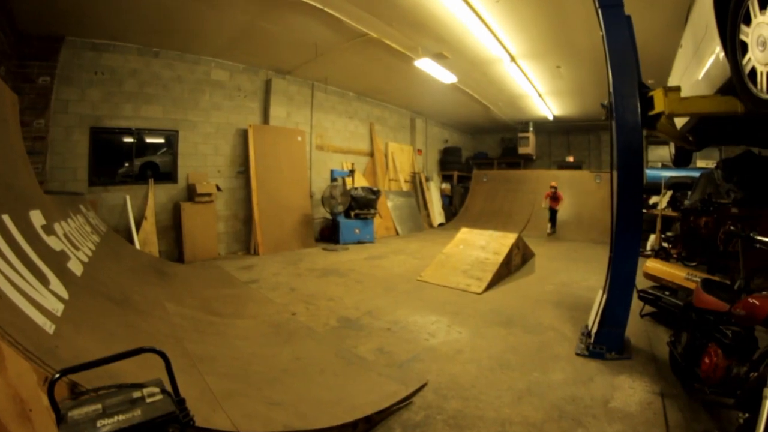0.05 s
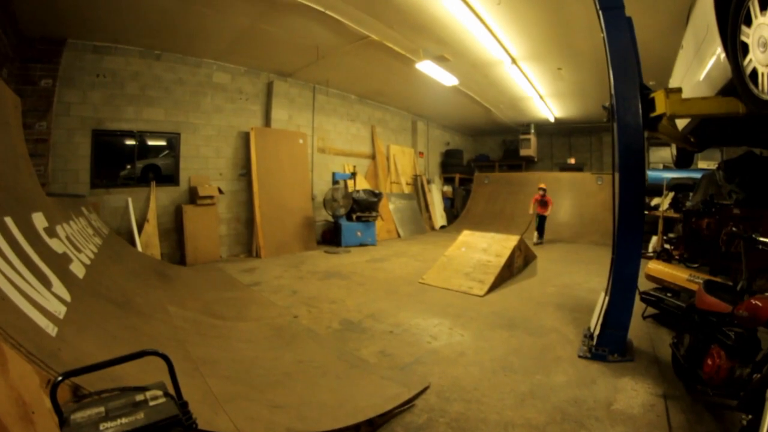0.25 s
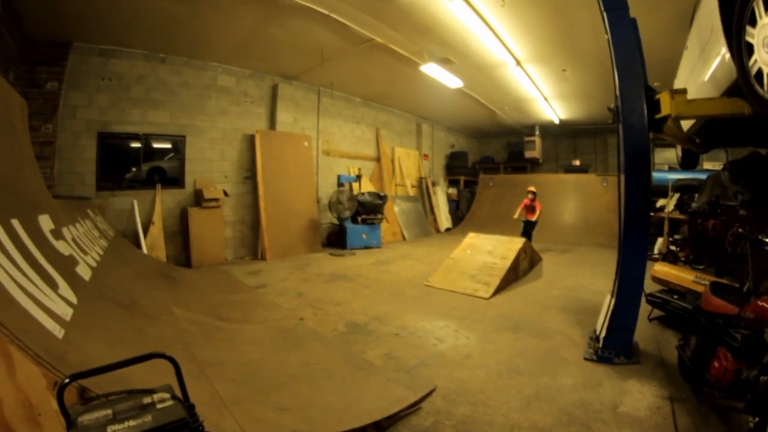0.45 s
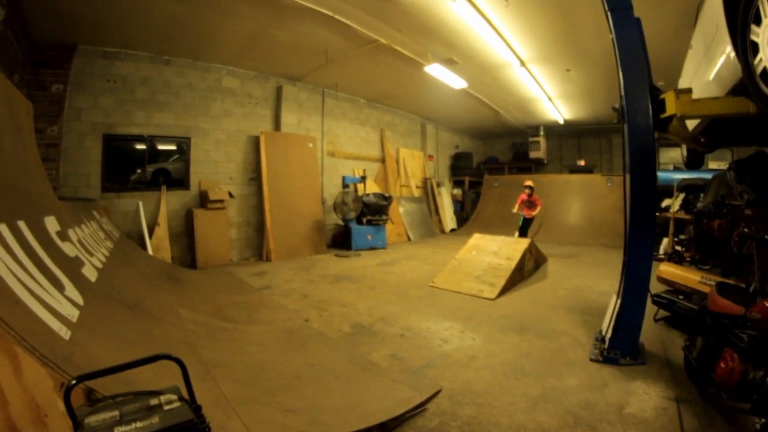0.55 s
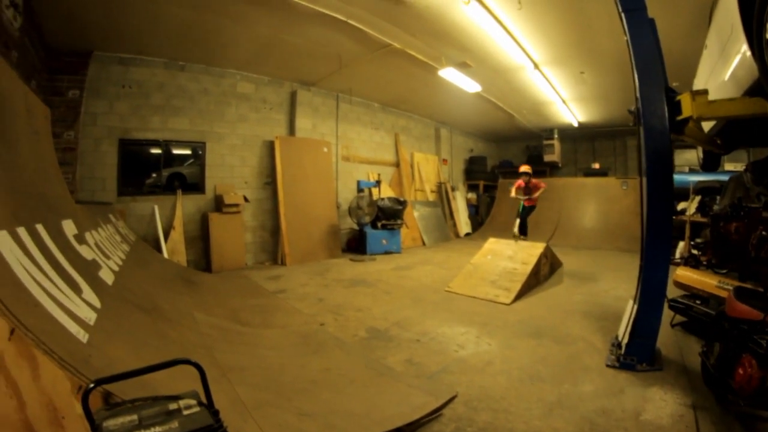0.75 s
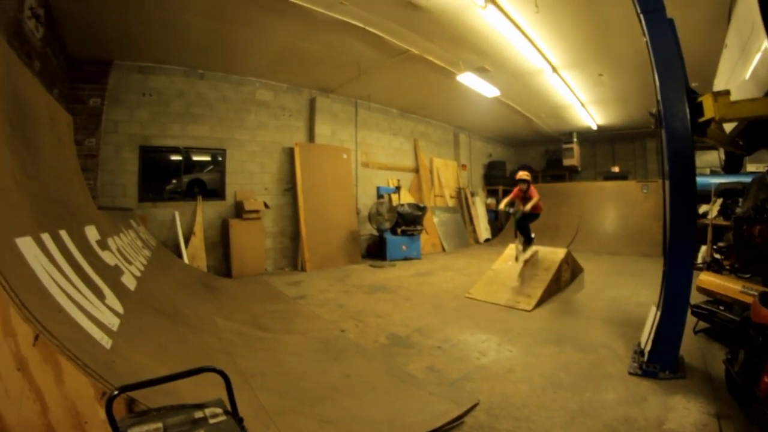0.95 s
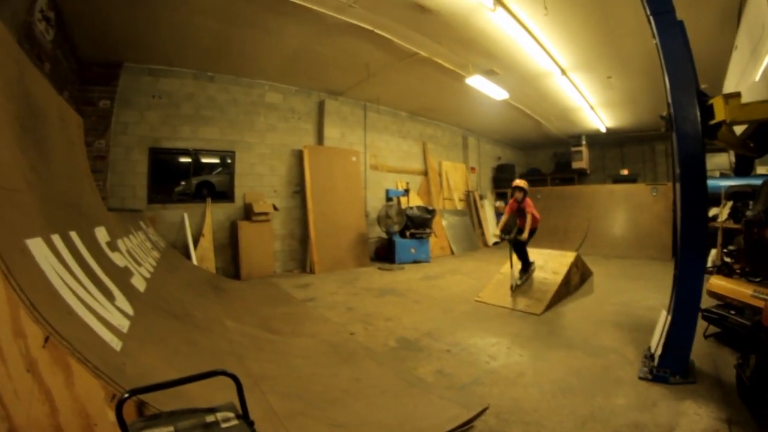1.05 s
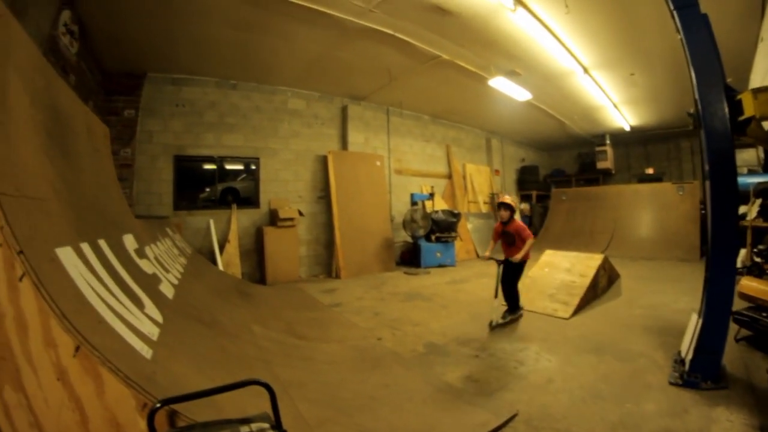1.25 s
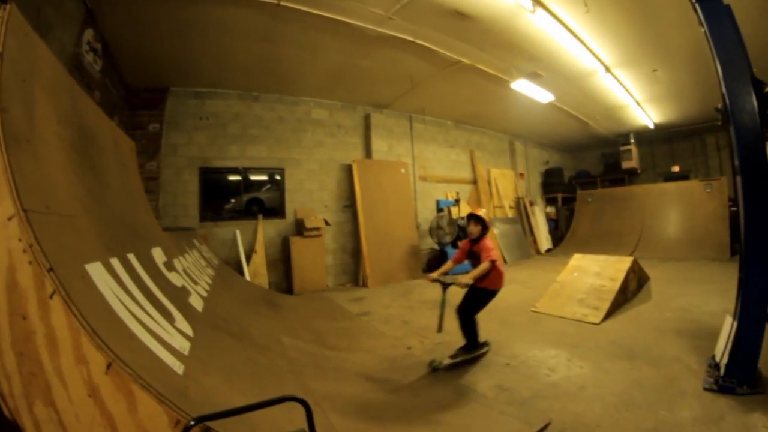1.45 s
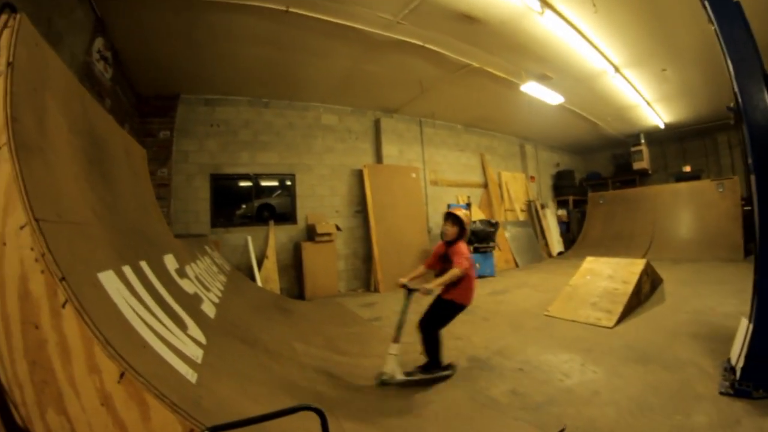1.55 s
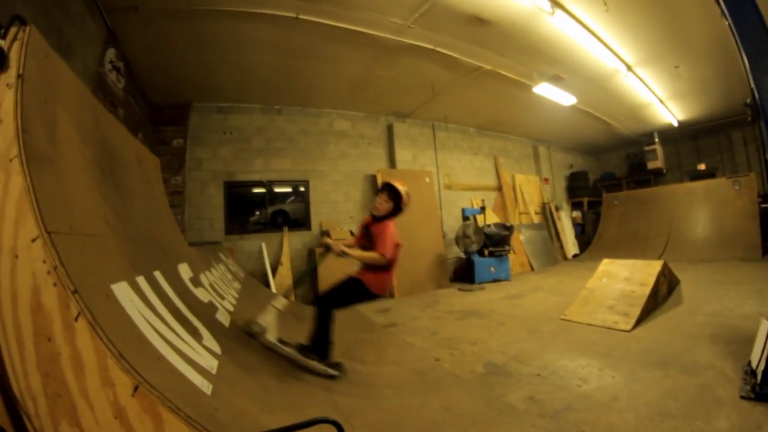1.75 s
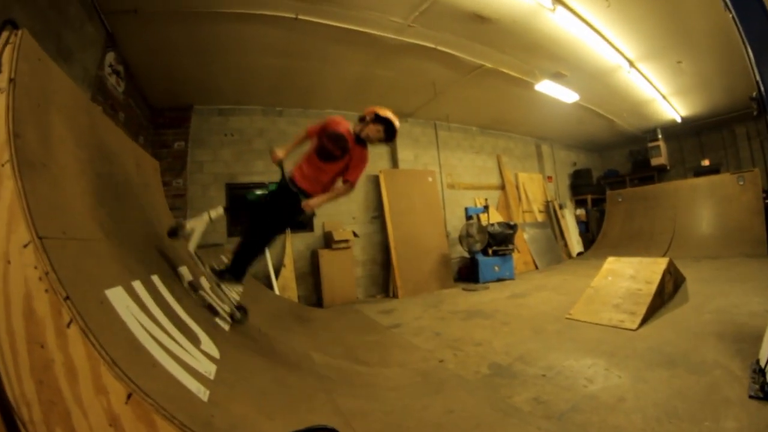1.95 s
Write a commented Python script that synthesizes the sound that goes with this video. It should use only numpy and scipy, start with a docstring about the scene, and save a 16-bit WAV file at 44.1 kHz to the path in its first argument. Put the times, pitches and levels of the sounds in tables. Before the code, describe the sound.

In a large, echoing workshop, a kick scooter approaches the microphone with rumbling wheels. It thuds over a plywood jump, lands with a clatter and a hollow metallic ring, then hits another ramp close by with sharp clacks.

```python
"""A kick scooter in a concrete workshop, closing from nine metres to just over one from the microphone.
It rolls off a booming plywood quarter pipe, whose edge plate rings, bangs up a kicker and flies.
It lands on the floor, deck rattling and loose parts ticking, then clacks onto a ramp close by.
All the way its frame rings with a hollow note at each jolt, and walls and a long room tail answer.
The hardest blows clip, and the limiter ducks after them."""
import sys
import numpy as np
from scipy import signal
from scipy.fft import rfft, irfft, next_fast_len
from scipy.io import wavfile
from scipy.ndimage import map_coordinates

SR = 44100
rng = np.random.default_rng(int(sys.argv[2]) if len(sys.argv) > 2 else 0)


def transcribe(signal):
    """Save signal, clipped to [-1, 1], as a 16-bit WAV file at the path in sys.argv[1]."""
    frames = np.atleast_2d(signal).T
    limited = np.clip(frames, -1, 1)
    pcm = np.round(limited * 32767).astype(np.int16)
    wavfile.write(sys.argv[1], SR, pcm)


N = 88200
HIT = SR // 2  # samples in one struck sound
TIME = np.arange(N) / SR


def amp(db):
    """Decibels to gain."""
    return np.exp(np.asarray(db) * np.log(10) / 20)


def unit_rms(x):
    """Scale to rms 1."""
    return x / np.sqrt(np.mean(x ** 2) + 1e-20)


def unit_energy(x):
    """Scale so that the squares sum to 1."""
    return x / np.linalg.norm(x)


def along(points, hz):
    """Read (Hz, value) points on a log frequency axis."""
    freqs, values = np.transpose(points)
    return np.interp(np.log(hz + 1), np.log(freqs + 1), values)


def level(points):
    """Gain per sample from (s, dB) points."""
    return amp(np.interp(TIME, *np.transpose(points)))


def filtered(x, response):
    """Filter x by a gain that is a function of frequency."""
    size = next_fast_len(N + SR // 4)
    return irfft(rfft(x, size) * response(np.fft.rfftfreq(size, 1 / SR)), size)[..., :N]


def noise(spectrum, tilt_db=0, size=N):
    """Coloured noise of rms 1, tilted by dB per octave above 500 Hz."""
    hz = np.fft.rfftfreq(size, 1 / SR)
    octaves = np.log2(np.maximum(hz / 500, 1))
    colour = amp(along(spectrum, hz) + tilt_db * octaves)
    return unit_rms(irfft(rfft(rng.standard_normal(size)) * colour, size))


def rough_noise(spectrum, depth_db, knots_per_s):
    """Coloured noise of rms 1 whose level follows a smooth random curve."""
    steady = noise(spectrum)
    wobble = map_coordinates(rng.standard_normal(1024), [TIME * knots_per_s], mode="wrap")
    return unit_rms(steady * amp(depth_db * wobble))


def fade(rise_s, t60_s):
    """Half a second of attack and decay."""
    t = np.arange(HIT) / SR
    return (1 - np.exp(-t / rise_s)) * amp(-60 * t / t60_s)


def ring(modes, rise_s, scatter_db, detune=0):
    """Damped sines, scattered in level, and in pitch if detuned, at every strike."""
    out = np.zeros(HIT)
    for k, (hz, db, t60) in enumerate(modes):
        t = np.arange(min(HIT, int(2 * t60 * SR))) / SR
        pitch = hz * np.exp(detune * rng.normal())
        wave = (-1) ** k * np.sin(2 * np.pi * pitch * t)
        out[:len(t)] += amp(db + scatter_db * rng.normal()) * fade(rise_s, t60)[:len(t)] * wave
    return out


def add(track, start_s, sound):
    """Mix a sound into the track."""
    part = track[max(round(start_s * SR), 0):][:len(sound)]
    part += sound[:len(part)]


# The workshop at rest. Each row: frequency in Hz, level in dB.
ROOM_TONE = [(20, -10), (45, -3), (80, -3), (130, -1), (220, -1), (400, -19), (1500, -20), (15000, -53)]

def room_tone():
    """A faint, low, steady noise around the microphone."""
    return amp(-48) * noise(ROOM_TONE)


# How long the workshop rings. Each row: frequency in Hz, t60 in seconds.
ROOM_T60 = [(100, 0.71), (400, 0.84), (1300, 1.04), (3200, 1.11), (6000, 0.51), (14000, 0.62)]

def reverb(x, rise_s=0.004):
    """The room's diffuse tail: noise dying away band by band, drawn anew at each call."""
    hz, t, bands = signal.stft(rng.standard_normal(SR * 3 // 4), SR, nperseg=256)
    envelope = amp(-60 * t / along(ROOM_T60, hz)[:, None]) * (1 - np.exp(-t / rise_s))
    tail = signal.istft(bands * envelope, SR, nperseg=256)[1]
    return signal.fftconvolve(x, unit_energy(tail))[:N]


# Wall echoes at the microphone. Each row: delay in seconds, level in dB.
WALLS = [(.0116, -7), (.0142, -6.5), (.0158, -12.5), (.0262, -13.5)]

def add_echoes(track, start, sound):
    """Walls return distinct echoes; ramps and shelves scatter a short wash."""
    for delay, db in WALLS:
        add(track, start + delay + rng.normal(0, 0.00023), amp(db) * sound)
    clutter = unit_energy(fade(rise_s=0.0021, t60_s=0.15) * rng.standard_normal(HIT))
    add(track, start + 0.0099, amp(-1) * signal.fftconvolve(sound, clutter))


# Colours of wheel roar, board rumble and ramp boom. Each row: frequency in Hz, level in dB.
ROAR = [(60, -70), (250, 5), (450, 2), (780, 6), (1050, 1.5), (1600, 2.5), (2400, -6.5), (3600, -11.5),
        (5500, -18), (8000, -30.5), (15000, -47.5)]
RUMBLE = [(20, -43), (42, -41), (62, -22), (90, -1), (135, 1), (200, 2), (300, -7.5), (500, -7), (1200, -5),
          (4000, -57)]
BOOM = [(18, -3), (42, -28), (65, -10), (120, -22), (400, -58)]
# Roar and rumble as they reach the microphone. Each row: time in seconds, level in dB.
ROAR_LEVELS = [(0, -32), (.19, -31), (.27, -25.5), (.37, -20), (.42, -28.5), (.54, -26.5), (.7, -21),
               (.88, -28), (1, -32), (1.14, -33), (1.25, -19), (1.32, -25.5), (1.42, -29.5), (1.51, -33),
               (1.6, -18.5), (1.77, -28), (1.88, -34.5), (2, -40)]
RUMBLE_LEVELS = [(0, -28.5), (.2, -29), (.25, -21.5), (.31, -20.5), (.39, -36.5), (.55, -40), (.61, -12.5),
                 (.74, -33), (.85, -27.5), (1.12, -52.5), (1.2, -24), (1.26, -21), (1.33, -25.5),
                 (1.42, -48), (1.52, -63), (1.6, -39), (1.8, -34.5), (2, -40.5)]
# On the far quarter pipe, then the near one. Each row: start and end in seconds, level in dB.
RAMP_RIDES = [(-.1, 0.376, -35.5), (1.528, 2.1, -40.5)]

def rolling(boom_fade_s=0.049):
    """Hard wheels roar over grit, the boards rumble and the hollow quarter pipes boom."""
    roar = level(ROAR_LEVELS) * rough_noise(ROAR, depth_db=0.63, knots_per_s=140)
    rumble = level(RUMBLE_LEVELS) * rough_noise(RUMBLE, depth_db=1.6, knots_per_s=35.33)
    on_ramp = sum(amp(db) * np.clip(np.minimum(TIME - start, end - TIME) / boom_fade_s, 0, 1)
                  for start, end, db in RAMP_RIDES)
    return roar + rumble + on_ramp * noise(BOOM)


# The deck, two to three metres off. Each row: frequency in Hz, level in dB.
DECK_RATTLE = [(150, -25), (580, 11), (1000, -3), (1800, 1), (3500, -9), (6000, -19), (9000, -21.5),
               (15000, -34)]

def deck_rattle(start_s=1.222, length_s=0.12):
    """The deck rattles briefly on the concrete after the landing."""
    progress = np.clip((TIME - start_s) / length_s, 0, 1)
    swell = np.sqrt(np.abs(np.sin(np.pi * progress)))
    rattle = amp(-23) * swell * rough_noise(DECK_RATTLE, depth_db=3.3, knots_per_s=260)
    return rattle + amp(-5) * reverb(rattle)


# The far ramp's edge plate. Each row: frequency in Hz, level in dB, t60 in seconds.
PLATE_MODES = [(554, -4, .3), (732, -1, .28), (958, -7, .25), (1217, -4, .4), (1653, -14, .4),
               (1830, -14, .3), (4037, -27, .4), (4274, -24, .25)]
# Loose parts, nearer the microphone. Each row: start in seconds, level in dB.
TICKS = [(1.2515, -16.5), (1.257, -24), (1.265, -15), (1.283, -16), (1.296, -29)]
# A tick's colour. Each row: frequency in Hz, level in dB.
TICK_COLOUR = [(500, -18), (2000, 2), (6000, 6), (9000, -14), (15000, -13)]

def metal_parts():
    """The edge plate rings as the wheels leave it; loose metal ticks after the landing."""
    out = np.zeros(N)
    add(out, 0.312, amp(-12) * ring(PLATE_MODES, rise_s=0.0076, scatter_db=2.5))
    for start, db in TICKS:
        add(out, start, amp(db) * fade(rise_s=0.0009, t60_s=0.019) * noise(TICK_COLOUR, size=HIT))
    return out + amp(-8.5) * reverb(out)


# The frame's hollow note. Each row: frequency in Hz, level in dB, t60 in seconds.
FRAME_MODES = [(1288.5, 2.5, 0.056), (1366, -10, 0.023), (1205, -4, 0.066), (2460, -21, 0.086),
               (3300, -24.5, 0.085)]
# Jolts that ring only the frame. Each row: start in seconds, level in dB.
JOLTS = [(0.335, -21), (0.355, -22), (0.375, -18), (0.422, -16), (0.459, -15), (0.508, -18.5), (0.73, -3),
         (0.772, -37), (0.807, -13), (0.893, -11.5), (1.217, -8), (1.4163, -10)]
# The colour of its buzz. Each row: frequency in Hz, level in dB.
BUZZ = [(300, -108), (950, -21), (1150, 1.5), (1295, 9), (1420, 5.5), (1650, -17), (3000, -48)]
# The buzz at the microphone. Each row: time in seconds, level in dB.
BUZZ_LEVELS = [(0, -74), (.29, -42), (.33, -16), (.45, -26.5), (.55, -36), (.72, -20.5), (.95, -30),
               (1.13, -27), (1.3, -31), (1.42, -27.5), (1.6, -25), (1.8, -32), (2, -41)]

def frame():
    """The frame rings at each jolt and wheel blow (BLOWS, below) and buzzes as the wheels spin."""
    notes = np.zeros(N)
    for start, db in [(blow[0], blow[-1]) for blow in BLOWS] + JOLTS:
        add(notes, start, amp(db) * ring(FRAME_MODES, rise_s=0.0017, scatter_db=0.2))
    tail = amp(-11) * reverb(notes)
    buzz = level(BUZZ_LEVELS) * rough_noise(BUZZ, depth_db=0.73, knots_per_s=55.4)
    return notes + tail + buzz


# The dull body of a blow. Each row: frequency in Hz, level in dB.
THUD = [(12, -45), (40, -19), (65, -33), (125, -10), (190, -0.5), (300, 2), (430, -5), (900, -13),
        (3000, -46)]
# The plywood's low modes. Each row: frequency in Hz, level in dB, t60 in seconds.
BOARD_MODES = [(42.3, -27, 0.22), (117, -7.5, 0.17), (135, -0.5, 0.16), (181, -10.5, 0.21),
               (252, -5, 0.049), (295.3, -3, 0.11)]

def board_thud(rise_s=0.0029):
    """A burst of low noise with the boards ringing under it."""
    burst = amp(-1) * fade(rise_s, t60_s=0.14) * noise(THUD, size=HIT)
    return burst + amp(-2.5) * ring(BOARD_MODES, rise_s, scatter_db=1.0)


# The sharp edge of a blow. Each row: frequency in Hz, level in dB.
CRACK = [(300, -10), (900, 9), (2500, 11.5), (5000, -7.5), (9000, -23), (15000, -28)]
# The scooter's approach. Each row: time in seconds, distance to the microphone in metres.
APPROACH = [(0, 9), (.6, 6.4), (1.15, 2.9), (1.54, 1.24), (2, 1.5)]

def contact_crack(start):
    """The hard contact, heard only directly, falling off as one over distance."""
    metres = np.interp(start, *np.transpose(APPROACH))
    return amp(1.5) / metres * fade(rise_s=0.0003, t60_s=0.0081) * noise(CRACK, size=HIT)


# A hard wheel on board. Each row: frequency in Hz, level in dB, t60 in seconds.
CLACK_MODES = [(458, -9, 0.018), (776, 0, 0.012), (1254, -4, 0.014), (1750, 1, 0.0092), (2930, -4, 0.0052),
               (3850, -7.5, .0055), (6160, -20, 0.0068)]
# Colours of the clatter and of a clack spread through the room. Each row: frequency in Hz, level in dB.
CLATTER = [(20, -42), (100, -56), (300, -1.5), (700, 1), (1100, 4), (1500, 8), (2200, 0.5), (3500, -5),
           (5500, -14.5), (8000, -26.5), (15000, -38)]
CLACK_TAIL = [(60, -32), (250, -12), (450, 4.5), (800, 1), (1400, 4), (2200, 0.5), (3300, -2), (4300, -11),
              (6000, -20), (9000, -30), (15000, -50.5)]
# Wheel blows, far to near. Each row: start in seconds, clack and clatter levels in dB, clatter t60
# in seconds, clatter tilt in dB per octave, thud and frame ring levels in dB.
BLOWS = [(0.208, -41.5, -21, 0.31, 0, -30, -36), (0.23, -31, -18.5, 0.38, -2, -21, -34),
         (0.259, -36, -35, 0.12, -15, -17.5, -39), (0.307, -10.5, -19, 0.23, 1.5, -28, -8),
         (0.563, -2.5, -10.5, 0.19, -0.5, -12.5, -10), (0.583, -10, -10, 0.18, 0, -9.5, -11),
         (0.657, -14, -15.5, 0.43, 2, -50, -43), (0.666, -2.5, -13, 0.25, 0, -31, -10),
         (1.1465, -4.5, -6.5, 0.065, 2.5, -5.5, -5.5), (1.156, -7.5, -8.5, 0.19, 1.5, -12, 0),
         (1.337, -10, -12, 0.19, 1, -21, -10), (1.348, -20, -21, 0.13, -10.5, -29, 2),
         (1.5412, 4.5, -9.5, 0.31, 0, -14, -51), (1.6475, 4, -22, 0.15, 4, -17, -12)]

def wheel_blows():
    """Each blow cracks and clacks, sets scooter and boards clattering, thuds and stirs the room."""
    out = np.zeros(N)
    tail_colour = amp(along(CLACK_TAIL, np.fft.rfftfreq(512, 1 / SR)))
    tail_pulse = unit_energy(np.roll(irfft(tail_colour), 256))
    for start, clack_db, clatter_db, t60, tilt_db, thud_db, _ in BLOWS:
        clack = amp(clack_db) * ring(CLACK_MODES, rise_s=0.00021, scatter_db=2.0, detune=0.042)
        clatter = amp(clatter_db) * fade(rise_s=0.00095, t60_s=t60) * noise(CLATTER, tilt_db, size=HIT)
        thud = amp(thud_db) * board_thud()
        crack = amp(clack_db) * contact_crack(start)
        add(out, start, crack + clack + clatter + thud)
        to_room = amp(-7.5) * clatter + amp(-10.5) * thud
        add(to_room, 0, amp(-4.5) * np.linalg.norm(clack) * tail_pulse)
        add(out, start, reverb(to_room))
        add_echoes(out, start, clack)
    return out


# Stereo width. Each row: frequency in Hz, side level in dB.
WIDTH = [(30, -44), (250, -58.5), (550, -60.5), (1100, -72.5), (2000, -41.5), (4000, -30.5), (12000, -34.5)]

def scene():
    """Almost mono, with a very faint diffuse difference between left and right."""
    mid = wheel_blows() + frame() + metal_parts() + deck_rattle() + rolling() + room_tone()
    side = reverb(filtered(mid, lambda hz: amp(along(WIDTH, hz))))
    return np.array([mid + side, mid - side])


def smooth(x, lag_s):
    """One-pole low-pass."""
    pole = np.exp(-1 / (lag_s * SR))
    return signal.lfilter([1 - pole], [1, -pole], x)


LIMIT_DB, RELEASE_DB_PER_S, ATTACK_S, TOP_HZ = -3, 18.5, 0.012, 16000

def record(dry):
    """Behind the microphone a limiter ducks fast and recovers slowly; then clipping and a band limit."""
    crest = np.sqrt(2 * smooth(dry.mean(axis=0) ** 2, lag_s=0.0011))
    over_db = np.maximum(20 * np.log10(crest + 1e-9) - LIMIT_DB, 0)
    recovery = RELEASE_DB_PER_S * TIME
    held_db = np.maximum.accumulate(over_db + recovery) - recovery
    ducked = dry * amp(-smooth(held_db, ATTACK_S))
    return filtered(np.clip(ducked, -1, 1), lambda hz: hz < TOP_HZ)


dry = scene()
out = record(dry)
transcribe(out)
```